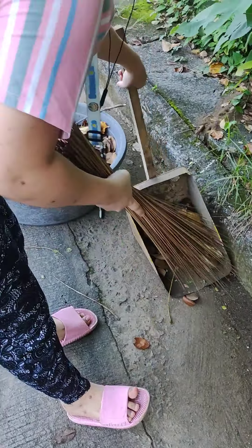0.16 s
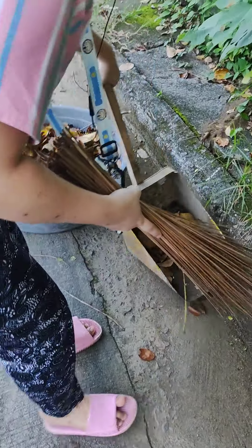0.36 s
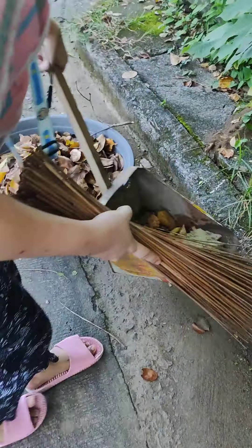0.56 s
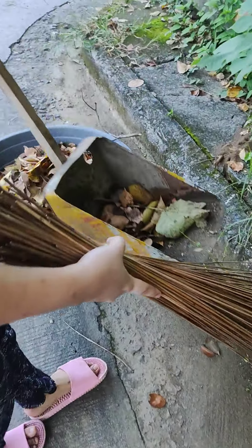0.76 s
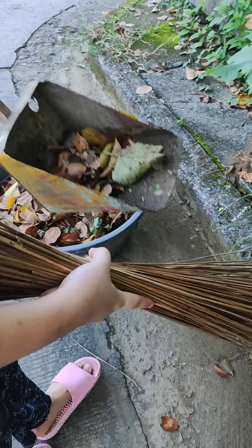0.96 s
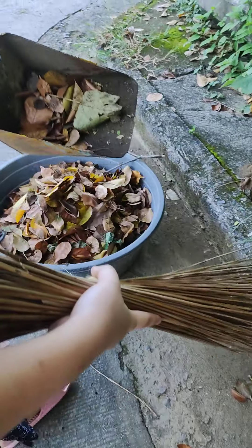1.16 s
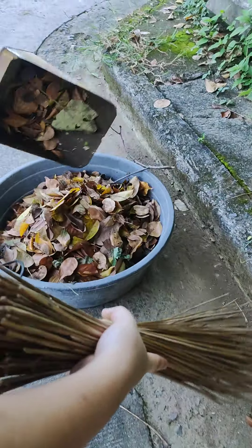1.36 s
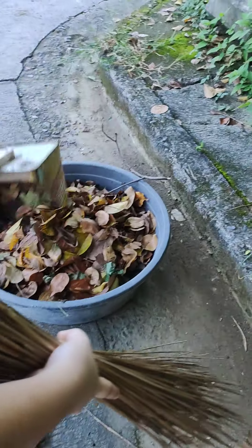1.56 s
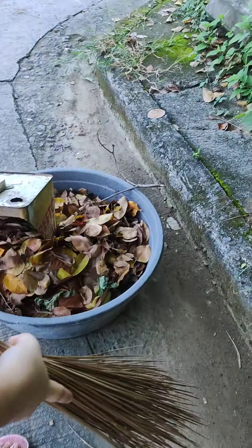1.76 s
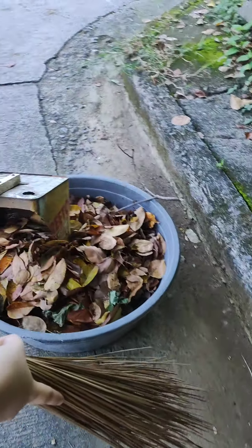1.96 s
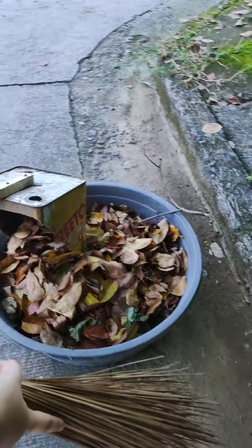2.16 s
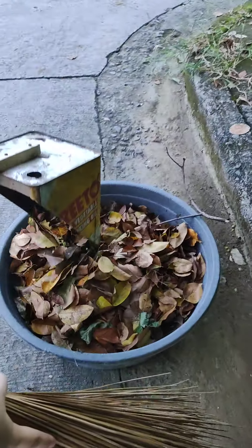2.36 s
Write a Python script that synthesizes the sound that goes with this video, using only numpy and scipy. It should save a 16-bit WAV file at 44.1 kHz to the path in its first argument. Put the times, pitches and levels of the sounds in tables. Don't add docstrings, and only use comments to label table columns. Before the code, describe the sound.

Close and dry outdoors: two quick hollow metal dustpan knocks, sparse twig snaps, a swelling crackle of dry leaves poured out, then a duller thump on a plastic tub, over distant insect shrill and soft traffic rumble.

```python
import sys
import numpy as np
from scipy import signal
from scipy.fft import rfft, irfft
from scipy.io import wavfile
from scipy.ndimage import uniform_filter1d

SR = 44100
rng = np.random.default_rng(int(sys.argv[2]) if len(sys.argv) > 2 else 0)


def linear_from_db(decibels):
    return 10 ** (np.asarray(decibels, float) / 20)


def transcribe(signal):
    frames = np.atleast_2d(signal).T
    limited = np.clip(frames, -1, 1)
    pcm = np.round(limited * 32767).astype(np.int16)
    wavfile.write(sys.argv[1], SR, pcm)


N = 105840
T = np.arange(N) / SR
HZ = np.arange(N // 2 + 1) * SR / N + 1

# pitch_hz, level_db, t60_s
MODES_RESTING = [(233.5, 7, 0.045), (311, 6, 0.089), (400, -2, 0.15), (496, -3.5, 0.13), (600, -7.5, 0.061),
                 (735, -1.5, 0.082), (944, -7, 0.047), (1175, -12, 0.044), (1370, -12, 0.04),
                 (1950, -13, 0.052), (2600, -6, .04)]
MODES_FREE = [(213.3, -18.5, 0.26), (343.3, -3, 0.063), (412.8, -2.5, 0.19), (479, -9, 0.17),
              (634, -4, 0.17), (832, -1.5, 0.13), (1010, -5, 0.069), (1200, -10.5, 0.17), (1338, -11, 0.11),
              (1942, -6.5, 0.077), (2073, -3, 0.066), (2466, 5, 0.05), (2910, -6.5, 0.062),
              (3236, 0, 0.045)]
MODES_ON_BASIN = [(178, -8.5, 0.079), (239.6, -1, 0.12), (278, -9.5, 0.26), (349, -5, 0.07),
                  (492, 0.5, 0.045), (536, -14.5, 0.33), (731, -23, 0.29), (861, -7.5, 0.066),
                  (111, -17, 0.14), (1244, -14, 0.067), (1820, -32, 0.049), (2050, -15, 0.09)]
# start_s, level_db, hardness_hz, length_s
KNOCKS_RESTING = [
    (.2405, -24.5, 700, 0.0038),
    (.249, -27, 1560, 0.0082),
    (.260, -28, 2600, 0.0039),
    (.274, -30, 900, 0.012),
    (.285, -35.5, 1200, 0.0076),
]
KNOCKS_FREE = [
    (.3487, -17, 5900, 0.0033),
    (.354, -12.5, 1620, 0.0055),
    (.364, -24, 3000, 0.002),
    (.374, -33, 2500, 0.0017),
    (.387, -31.5, 2500, 0.0021),
    (.429, -42.5, 3500, 0.0076),
    (.445, -34.5, 510, 0.021),
]
KNOCKS_ON_BASIN = [(1.27, -37, 298, 0.054), (1.335, -47, 295, 0.027), (1.565, -43.5, 283, 0.041),
                   (1.6, -38.5, 272, 0.01), (1.815, -34.5, 240, 0.013), (1.865, -38, 200, .02),
                   (2.033, -27, 3060, 0.006), (2.042, -16, 1300, 0.0085), (2.067, -24.5, 1500, 0.027),
                   (2.09, -38.5, 1430, 0.011), (2.116, -30.5, 580, 0.012), (2.138, -30, 433, 0.0017),
                   (2.169, -26, 490, 0.01), (2.185, -35, 795, 0.03), (2.17, -27, 130, .03),
                   (2.205, -38.5, 800, .015), (2.222, -38.5, 600, 0.052), (2.273, -41.5, 870, 0.0084)]
TWIN_DETUNE, TWIN_DB, TWIN_T60_SHARE = 0.065, -2, 0.15
CLOSE_DETUNE, CLOSE_DB, CLOSE_T60_SHARE = 0.043, -11.0, 0.76
CLATTER_DB, CLATTER_T60_S, CLATTER_HZ = 1, 0.16, 1670
GRIT_SHARE = 0.5
RATTLE_DB, RATTLE_S, RATTLE_HZ = 3.5, 0.006, 900
PAN_CUT_HZ = 101
# pitch_hz, likeness_0_to_1
PAN_ALIKE = [(250, 1), (500, 0.97), (3500, 0.87), (8000, .9)]
# pitch_hz, left_lead_rad
PAN_TURN = [(200, -0.72), (380, 0.4), (700, -1.5), (1030, -0.65), (1400, 1.26), (1720, 2.15), (2070, -1.5),
            (3450, -2.5)]

# start_s, attack_s, hold_s, release_t60_s, level_db
RUSTLES = [
    (0, 0.00033, 0.0086, 1.83, -45.5),
    (0.621, 0.0031, 0.055, 0.17, -46),
    (1.096, 0.0058, 0.04, 0.21, -44),
    (1.223, 0.046, 0.031, 0.26, -37.5),
    (1.569, 0.1, 0.038, 0.86, -32.5),
    (2.023, 0.0067, 0.042, 22, -48),
    (1.532, 0.045, 0.22, .35, -53.5),
]
RUSTLE_LAGS = [5.5, 2.5, -3, -16, 8.5, 4, 9.5]
# pitch_hz, level_db_per_hz
BROOM_LIFT = [(300, -3), (1000, -21.5), (1900, -6.5), (2900, -8), (4000, -12), (8000, -14), (14000, -19.5)]
BROOM_BRUSH = [(300, -5.5), (1160, -16.5), (1630, -3.5), (2990, -7), (4540, -25), (9000, -17.5),
               (14000, -26)]
PAN_SCUFF = [(200, -2), (500, -1.5), (900, -5.5), (1300, -20.5), (3000, -16.5), (14000, -43)]
LEAVES_SHIFT = [(300, -12), (700, -5), (1030, -1.5), (1700, -2), (2990, -1), (5000, -8.5), (9000, -12),
                (14000, -28)]
LEAVES_POUR = [(150, -13), (700, -7.5), (1500, -9.5), (1950, -5), (2900, -4), (4500, -17.5), (8000, -17),
               (14000, -23.5)]
LEAVES_SETTLE = [(300, 12), (1000, 8.5), (2000, 9.5), (2900, 11.5), (4000, 1.5), (8000, 1.5),
                 (14000, -10.5)]
LEAVES_AIRY = [(1000, -35), (3500, 1.5), (8000, 6), (14000, -8.5)]
GRAINS_PER_S, GRAIN_SPREAD_DB, CLUMP_DB = 9000, 3, 1
# pitch_hz, width_hz, level_db
TIN_RING = [(886, 240, -17.5), (1280, 92, -23), (1865, 47, -9), (2130, 130, -20)]

# start_s, peak_db, pitch_hz, width_hz, side (1 right, -1 left)
SNAPS = [(.068, -34, 11000, 6100, 1), (0.431, -36, 2710, 1600, 1), (.467, -33, 1570, 1600, -1),
         (0.5068, -30.5, 1700, 1200, 1), (0.51, -30.5, 3200, 895, 1), (0.5088, -38.5, 9000, 8000, 1),
         (0.525, -29.5, 1900, 910, 1), (0.5275, -33.5, 3200, 804, 1), (0.616, -29.5, 2000, 2400, 1),
         (0.874, -37.5, 5300, 800, 1), (.884, -34, 4870, 800, 1), (.897, -40, 4150, 700, 1),
         (0.913, -39, 3730, 700, 1), (1.014, -35.5, 2360, 2020, -1), (1.2212, -34, 900, 1200, -1),
         (1.2275, -36, 1440, 500, -1), (1.227, -30, 3000, 1000, -1), (1.224, -42.5, 9000, 8000, -1),
         (1.266, -29, 2100, 1200, -1), (1.273, -27, 1010, 250, -1), (1.2724, -22, 2500, 900, -1),
         (1.296, -33, 2950, 500, -1), (1.352, -39, 1900, 400, -1), (1.3865, -37.5, 1820, 500, -1),
         (1.6087, -32, 10000, 7160, 1), (2.0875, -29.5, 4000, 8000, 1)]
SNAP_T60_S, SNAP_RISE_S = 0.03, 0.001
# start_s, length_s, from_hz, to_hz, level_db
SQUEAKS = [
    (1.325, 0.0426, 3260, 2903, -39.5),
]
# start_s, length_s, from_hz, to_hz, level_db
SCRAPES = [
    (1.645, 0.039, 1870, 1750, -54),
    (1.668, 0.052, 2160, 2050, -44),
    (1.71, .035, 2500, 2420, -44),
    (1.715, 0.048, 1950, 1797, -38),
    (1.81, 0.058, 1830, 1812, -49),
]
# pitch_hz, likeness_0_to_1
NEAR_ALIKE = [(300, 0.94), (1000, 0.05), (1900, 0.46), (2800, 0.7), (3800, 0.1), (14000, 0)]

# pitch_hz, width_hz, level_db, throbs_per_s, throb_depth_0_to_1
INSECTS = [
    (6993, 360, -56, 8.5, 0.13),
    (4933, 630, -57, 29, 0.28),
]
INSECT_CLICKS_PER_S = 4000
# pitch_hz, level_db_per_hz
RUMBLE = [(30, -7), (42, -5.5), (55, -9), (80, -9.5), (170, -6), (420, -16.5), (1000, -24), (3000, -41.5)]
# pitch_hz, level_db_per_hz
HISS = [(500, 6.5), (1300, 1.5), (2000, 4.5), (3000, 6), (3900, -5), (8500, -11), (11000, -10.5),
        (14000, -39)]
# pitch_hz, likeness_0_to_1
FAR_ALIKE = [(250, 0.98), (500, 0.81), (900, 0.14), (1300, 0.099), (14000, 0.017)]
RUMBLE_DB, RUMBLE_PATCHY_DB = -47, 1.0
HISS_DB, HISS_PATCHY_DB = -53, 1.5
HUM_HZ, HUM_DB = 25.8, -54.5
AIR_LAG = -3
# pitch_hz, left_over_right_db
PORTS = [(300, 0.5), (1100, -2), (1900, 5.5), (2400, -1.5), (5000, -3), (8000, -9.5), (10000, 5),
         (13000, -11.5)]
CUTOFF_HZ = 14350


def rms_one(x):
    return x / np.sqrt(np.mean(x ** 2) + 1e-20)


def at_hz(points):
    hz, value = np.array(points).T
    return np.interp(np.log(HZ), np.log(hz), value)


def colour(x, spectrum):
    return irfft(rfft(x) * linear_from_db(at_hz(spectrum)), N)


def drift(rate_hz):
    r = np.exp(-2 * np.pi * rate_hz / SR)
    return rms_one(signal.lfilter([1], [1, -2 * r, r * r], rng.standard_normal(N + SR))[SR:])


def resonance(x, hz, width_hz):
    r = np.exp(-np.pi * width_hz / SR)
    poles = [1, -2 * r * np.cos(2 * np.pi * hz / SR), r * r]
    return signal.lfilter([(1 - r * r) / 2, 0, (r * r - 1) / 2], poles, x + 1e-18)


def ports(x, lag, alike, turn=0):
    share = np.clip(at_hz(alike), 0, 1)
    spectrum = rfft(x)
    half_phase = np.pi * HZ / SR * lag - turn / 2
    shift = np.exp(-1j * half_phase * np.array([[1], [-1]]))
    common = spectrum[0] * shift * np.sqrt(share)
    own = 1j * np.sqrt(1 - share) * spectrum[1:]
    return irfft(common + own, N)


def burst(start_s, t60_s):
    return (T >= start_s) * linear_from_db(-60 * np.maximum(T - start_s, 0) / t60_s)


def pan_contacts(bumps):
    push, clatter = np.zeros((2, 3, N + SR))
    span = SR // 4
    t = T[:span]
    for start_s, db, hard_hz, length_s in bumps:
        grit, tail = rng.standard_normal((2, 3, span))
        soft = signal.butter(2, min(hard_hz, 15000), fs=SR, output="sos")
        along = np.clip(t / length_s, 0, 1)
        rub = GRIT_SHARE * grit * np.sin(np.pi * along) * np.sqrt(2 / (length_s * SR))
        tail = tail * along * burst(0, CLATTER_T60_S)[:span]
        i = int(start_s * SR)
        push[:, i:i + span] += linear_from_db(db) * signal.sosfilt(soft, (t == 0) + rub)
        clatter[:, i:i + span] += linear_from_db(db + CLATTER_DB) * signal.sosfilt(soft, tail)
    return push, clatter


def neighbours(modes, detune, db_change, t60_share):
    return [(hz * (1 + detune * (-1) ** k), db + db_change, t60 * t60_share)
            for k, (hz, db, t60) in enumerate(modes)]


def pan_knocks(bumps, modes):
    push, clatter = pan_contacts(bumps)
    a, b = int(bumps[0][0] * SR), int(bumps[-1][0] * SR) + SR // 3
    ring = resonance(clatter[:, a:b], CLATTER_HZ, 2200)
    twins = neighbours(modes, TWIN_DETUNE, TWIN_DB, TWIN_T60_SHARE)
    close = neighbours(modes, -CLOSE_DETUNE, CLOSE_DB, CLOSE_T60_SHARE)
    for k, (hz, db, t60_s) in enumerate(modes + twins + close):
        r, w = linear_from_db(-60 / (t60_s * SR)), 2 * np.pi * hz / SR
        rattle = rms_one(uniform_filter1d(rng.standard_normal(b - a), int(RATTLE_S * SR)))
        waver = linear_from_db(RATTLE_DB * min(hz / RATTLE_HZ, 1) * rattle)
        strength = linear_from_db(db) * np.sin(w) * (-1) ** k
        poles = [1, -2 * r * np.cos(w), r * r]
        ring += waver * signal.lfilter([0, strength], poles, push[:, a:b] + 1e-18)
    ring[1] *= -1
    radiated = signal.butter(3, [PAN_CUT_HZ, 3600], "band", fs=SR, output="sos")
    out = np.zeros((3, N + SR))
    out[:, a:b] = signal.sosfilt(radiated, ring)
    return out[:, :N]


def leaves():
    strength = linear_from_db(GRAIN_SPREAD_DB * np.minimum(rng.exponential(1, N), 4))
    grains = (rng.random(N) < GRAINS_PER_S / SR) * strength * rng.choice([-1, 1], (3, N))
    rubbing = 0.8 * rng.standard_normal((3, N))
    crackle = (rms_one(grains) + rubbing) * linear_from_db(CLUMP_DB * drift(49))
    crackle = crackle + sum(linear_from_db(db) * resonance(crackle, hz, width_hz) * 2 for hz, width_hz, db in TIN_RING)
    tones = [BROOM_LIFT, BROOM_BRUSH, PAN_SCUFF, LEAVES_SHIFT, LEAVES_POUR, LEAVES_SETTLE, LEAVES_AIRY]
    out = np.zeros((2, N))
    for (start_s, attack_s, hold_s, t60_s, db), lag, tone in zip(RUSTLES, RUSTLE_LAGS, tones):
        rise = np.clip((T - start_s) / attack_s, 0, 1) ** 2
        fall_db = 60 * np.maximum(T - start_s - attack_s - hold_s, 0) / t60_s
        tone_rms = np.sqrt(np.mean(linear_from_db(at_hz(tone)) ** 2))
        out += ports(colour(crackle * rise * linear_from_db(db - fall_db), tone) / tone_rms, lag, NEAR_ALIKE)
    return out


def snaps():
    grit = rng.standard_normal((3, N))
    right, left = np.zeros((2, 3, N))
    span = SR // 10
    shape = burst(0, SNAP_T60_S)[:span] * np.minimum(T[:span] / SNAP_RISE_S, 1)
    for start_s, db, hz, width_hz, side in SNAPS:
        i = int(start_s * SR)
        crack = grit[:, i:i + span] * shape * linear_from_db(db) * np.sqrt(SR / width_hz / 4)
        place = right if side > 0 else left
        place[:, i:i + span] += resonance(resonance(crack, hz, width_hz), hz, width_hz)
    return ports(right, 3.3, NEAR_ALIKE) + ports(left, -4.5, NEAR_ALIKE)


def squeaks(rows, lag, waver_db):
    out = np.zeros(N)
    waver = linear_from_db(waver_db * drift(204))
    for start_s, length_s, from_hz, to_hz, db in rows:
        along = np.clip((T - start_s) / length_s, 0, 1)
        swell = np.sqrt(np.abs(np.sin(np.pi * along))) * (along < 1)
        pitch_hz = from_hz + (to_hz - from_hz) * along ** 0.65
        out += linear_from_db(db) * swell * np.sin(2 * np.pi * np.cumsum(pitch_hz) / SR)
    return ports(np.tile(out * waver, (3, 1)), lag, NEAR_ALIKE)


def insects():
    out = np.zeros((2, N))
    for hz, width_hz, db, throb_hz, depth in INSECTS:
        clicks = (rng.random((2, N)) < INSECT_CLICKS_PER_S / SR) * rng.standard_normal((2, N))
        throb_phase = 2 * np.pi * np.cumsum(throb_hz * (1 + 0.28 * drift(4.6))) / SR
        beat = 1 + depth * np.sin(throb_phase)
        band = resonance(resonance(clicks, hz, width_hz * 1.5), hz, width_hz * 1.5)
        out += linear_from_db(db + drift(10.0)) * beat * rms_one(band)
    return out


def air():
    rumble = rms_one(colour(rng.standard_normal((3, N)), RUMBLE))
    rumble = rumble * linear_from_db(RUMBLE_DB + RUMBLE_PATCHY_DB * drift(11.6))
    hiss = rms_one(colour(rng.standard_normal((3, N)), HISS))
    hiss = hiss * linear_from_db(HISS_DB + HISS_PATCHY_DB * drift(13.0))
    hum = linear_from_db(HUM_DB) * np.sin(2 * np.pi * HUM_HZ * T)
    return ports(rumble + hiss, AIR_LAG, FAR_ALIKE) + hum


def scene():
    ground = pan_knocks(KNOCKS_RESTING, MODES_RESTING) + pan_knocks(KNOCKS_FREE, MODES_FREE)
    ground = ports(ground, 0, PAN_ALIKE, at_hz(PAN_TURN)) * linear_from_db(0.74 * np.array([[1], [-1]]))
    basin = ports(pan_knocks(KNOCKS_ON_BASIN, MODES_ON_BASIN), 4.3, PAN_ALIKE)
    twig = squeaks(SQUEAKS, -3.2, waver_db=3.0)
    stems = squeaks(SCRAPES, 3.6, waver_db=3.5)
    return ground + basin + leaves() + snaps() + twig + stems + insects() + air()


def top_cut(x):
    return signal.sosfilt(signal.butter(12, 14560, fs=SR, output="sos"), x)


def record(dry):
    rounded = 1.229 * np.tanh(dry / 1.319)
    tilt = linear_from_db(at_hz(PORTS) * np.array([[0.5], [-0.5]])) * (HZ < CUTOFF_HZ)
    mix = irfft(rfft(rounded) * tilt, N)
    return top_cut(mix)


dry = scene()
out = record(dry)
transcribe(out)
```